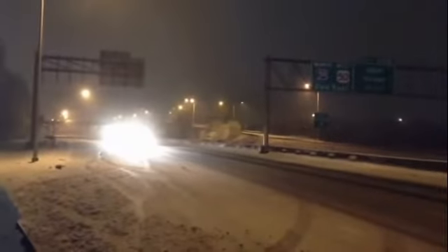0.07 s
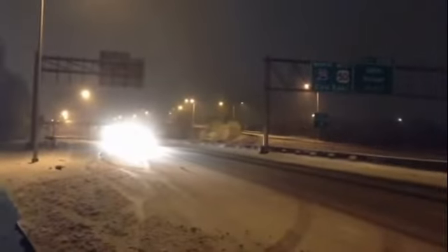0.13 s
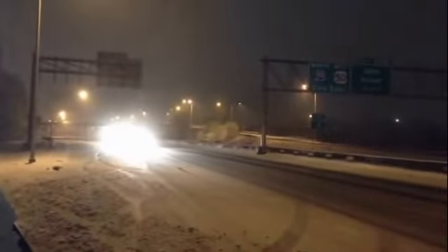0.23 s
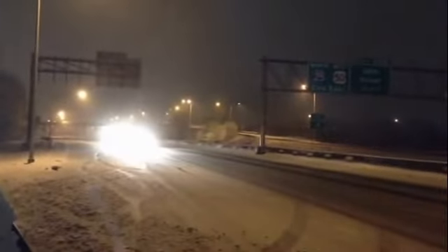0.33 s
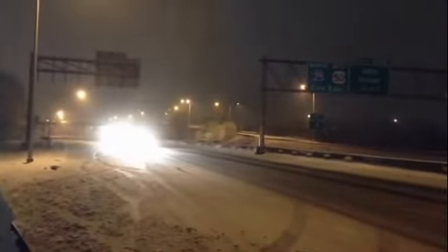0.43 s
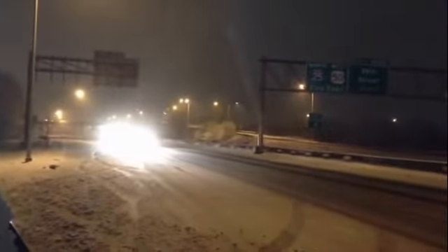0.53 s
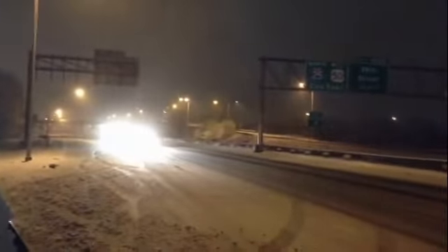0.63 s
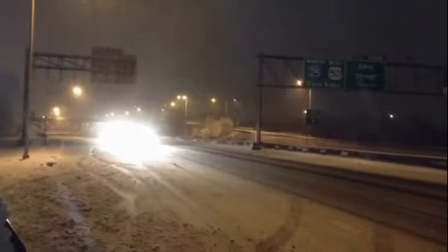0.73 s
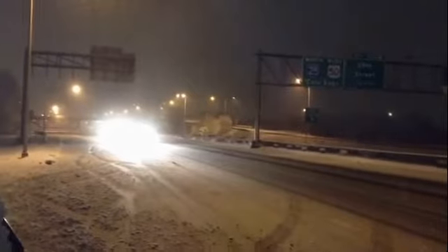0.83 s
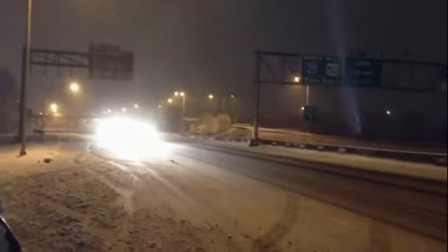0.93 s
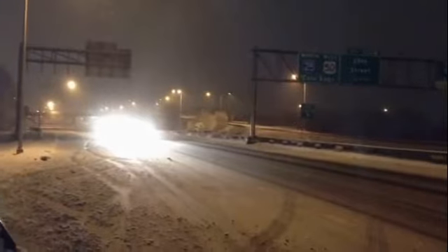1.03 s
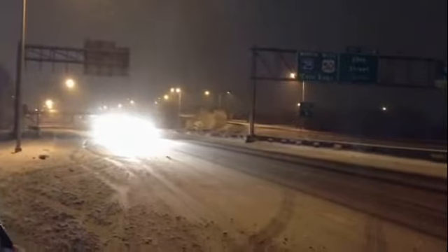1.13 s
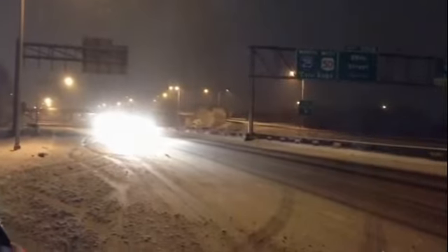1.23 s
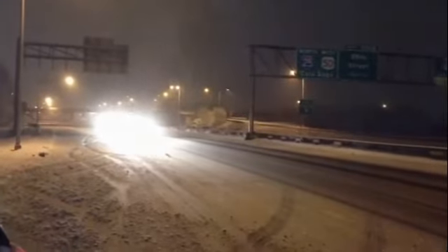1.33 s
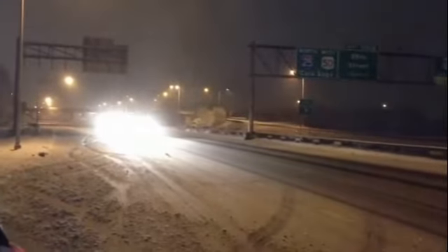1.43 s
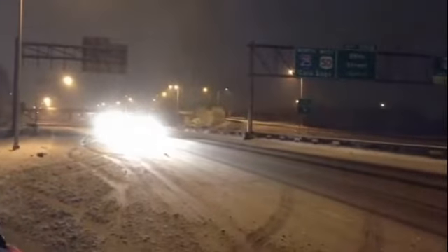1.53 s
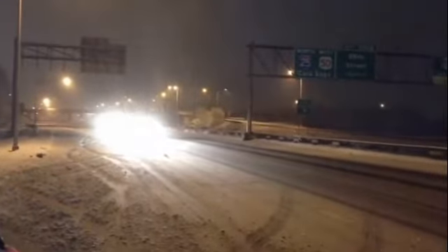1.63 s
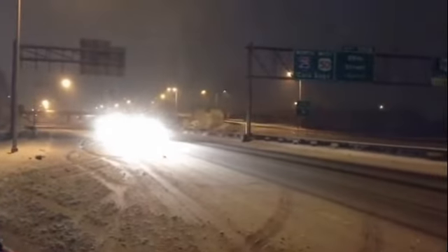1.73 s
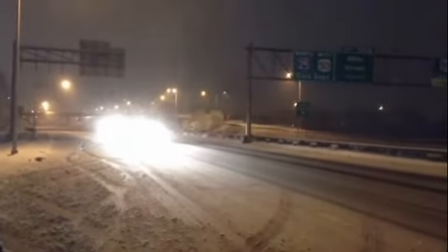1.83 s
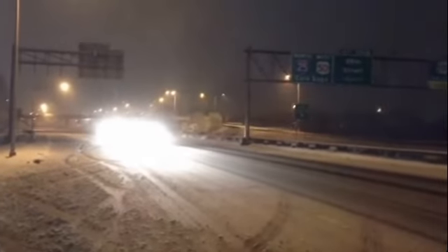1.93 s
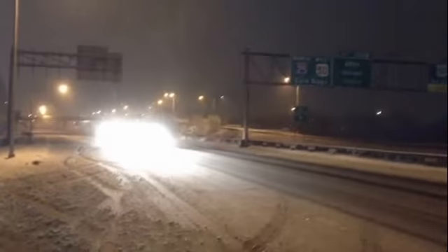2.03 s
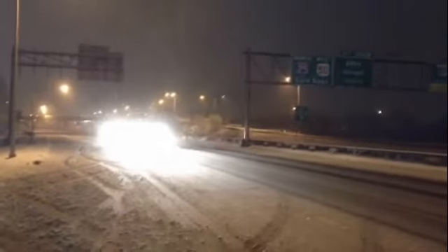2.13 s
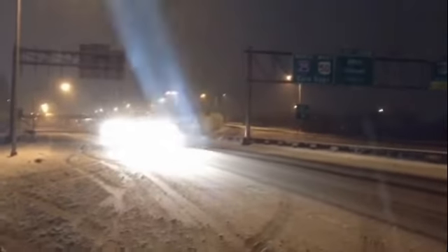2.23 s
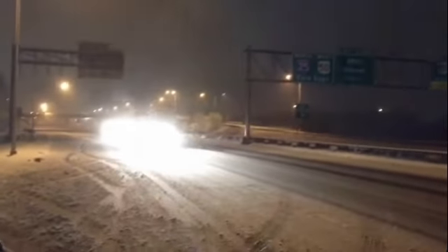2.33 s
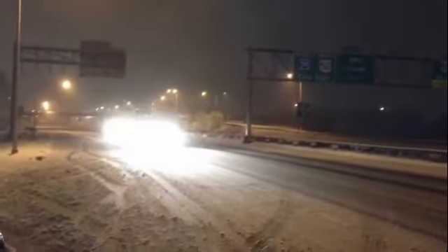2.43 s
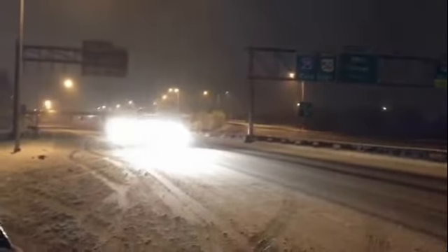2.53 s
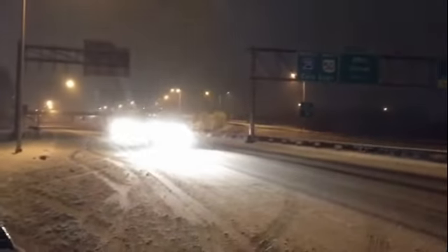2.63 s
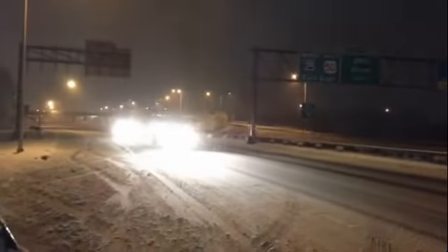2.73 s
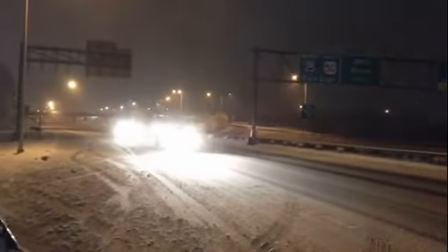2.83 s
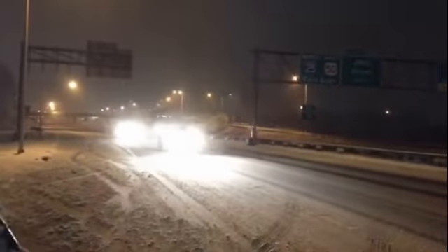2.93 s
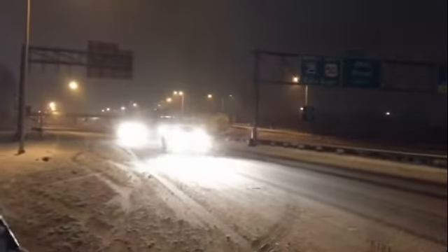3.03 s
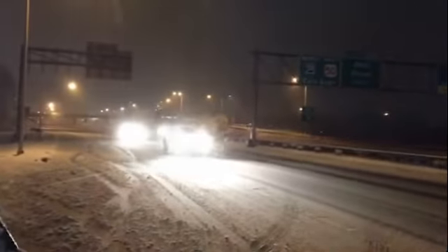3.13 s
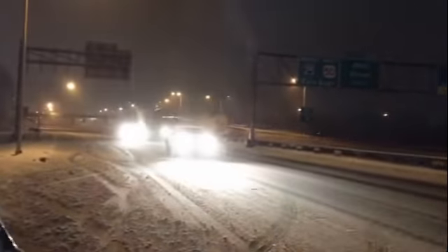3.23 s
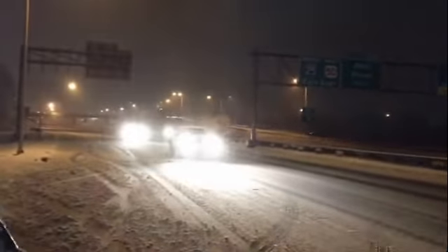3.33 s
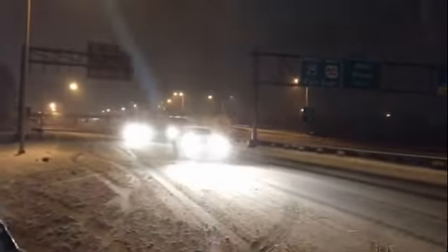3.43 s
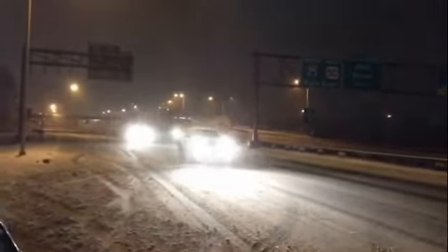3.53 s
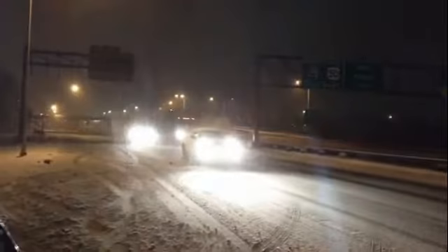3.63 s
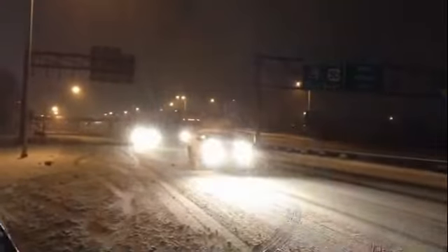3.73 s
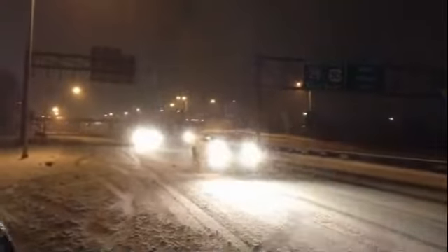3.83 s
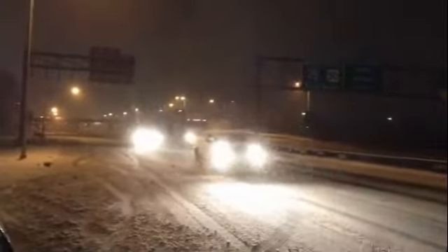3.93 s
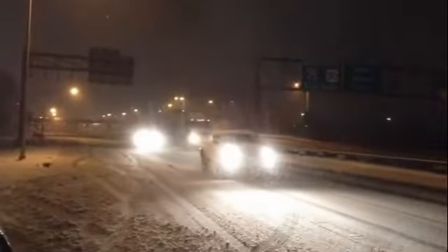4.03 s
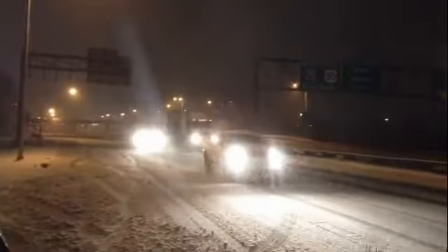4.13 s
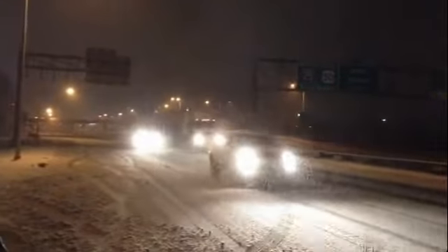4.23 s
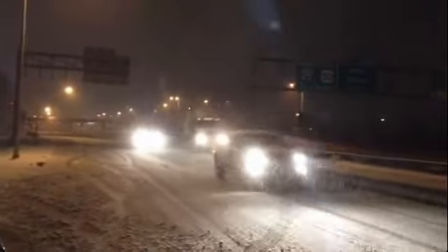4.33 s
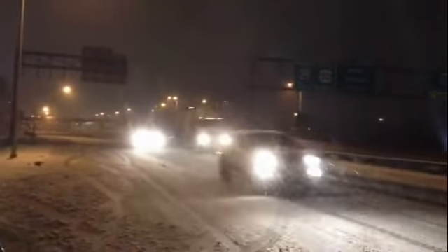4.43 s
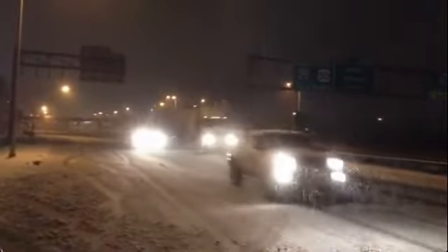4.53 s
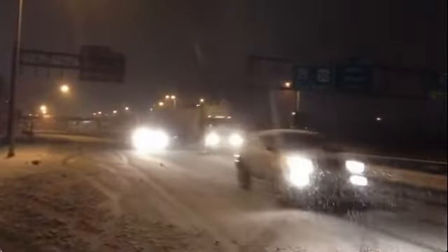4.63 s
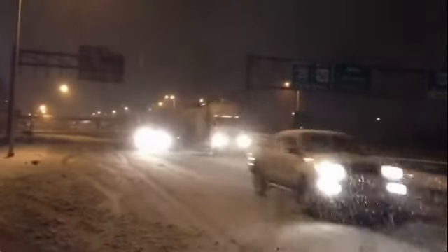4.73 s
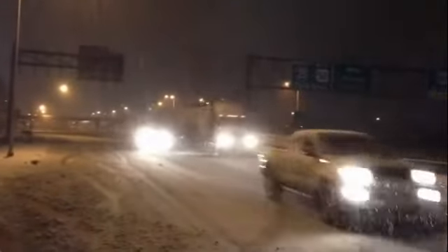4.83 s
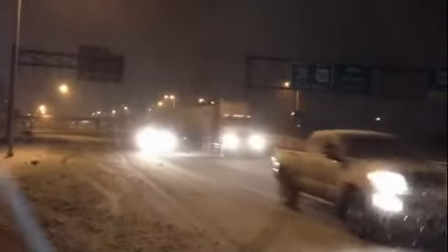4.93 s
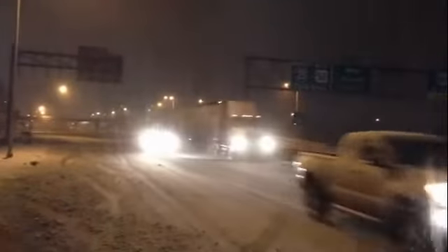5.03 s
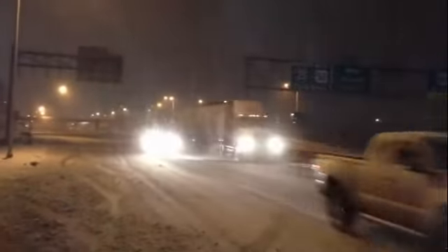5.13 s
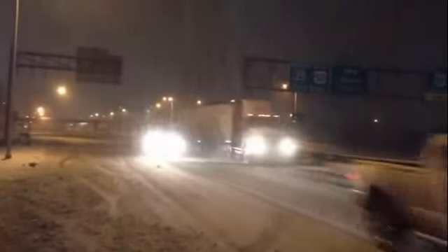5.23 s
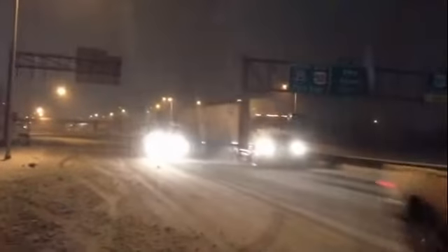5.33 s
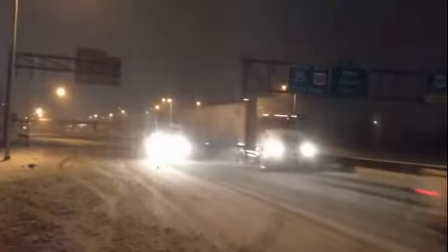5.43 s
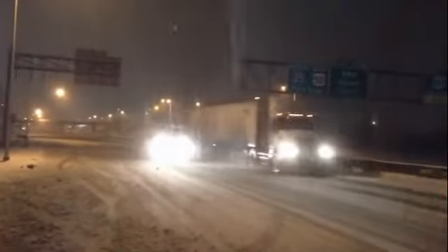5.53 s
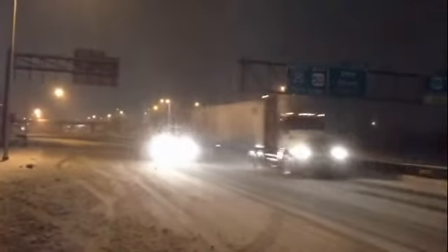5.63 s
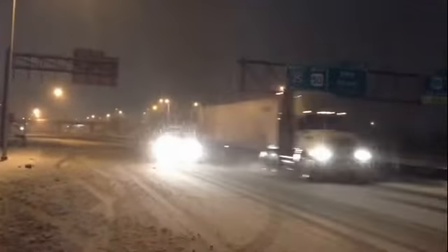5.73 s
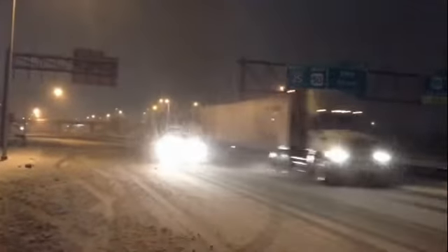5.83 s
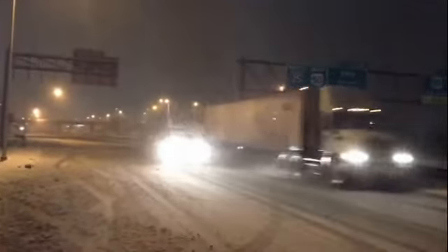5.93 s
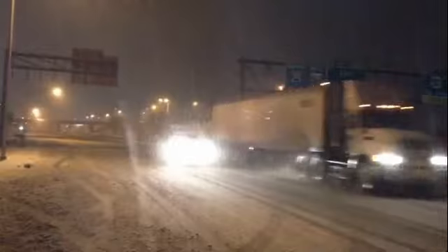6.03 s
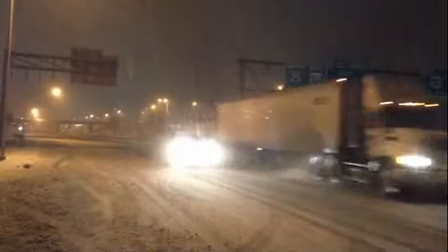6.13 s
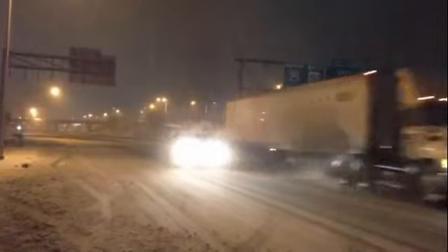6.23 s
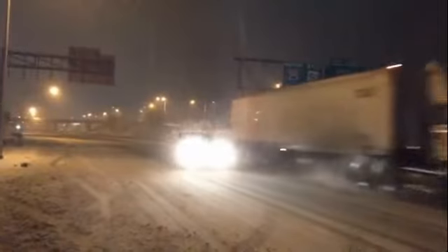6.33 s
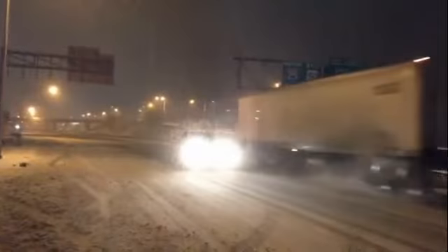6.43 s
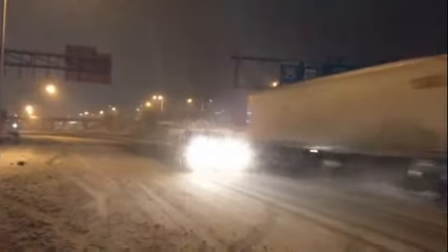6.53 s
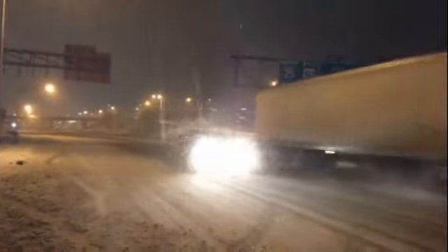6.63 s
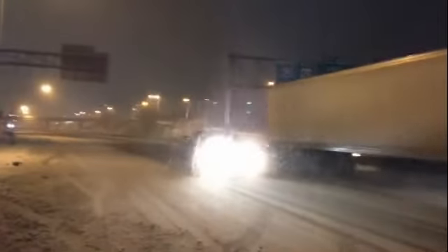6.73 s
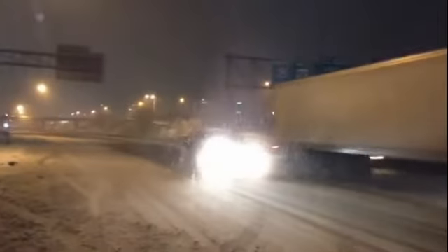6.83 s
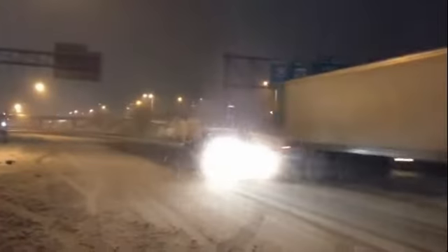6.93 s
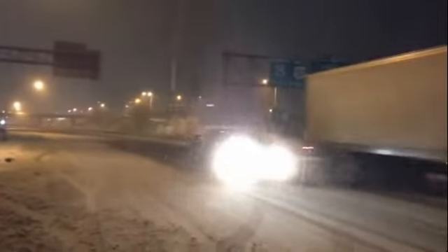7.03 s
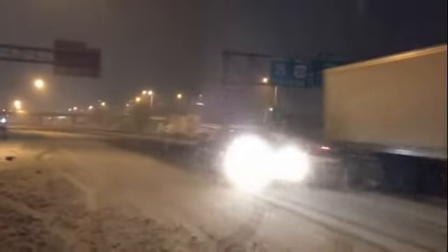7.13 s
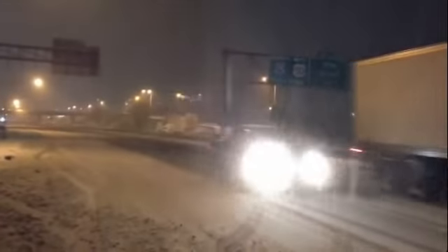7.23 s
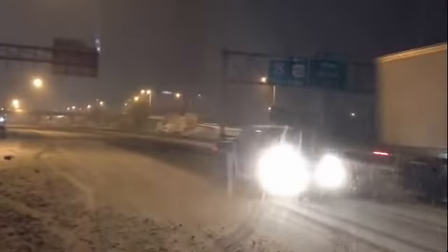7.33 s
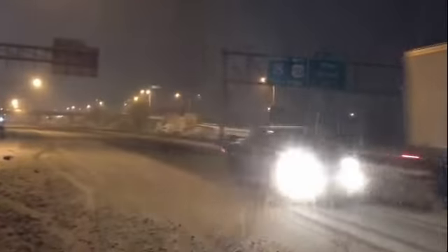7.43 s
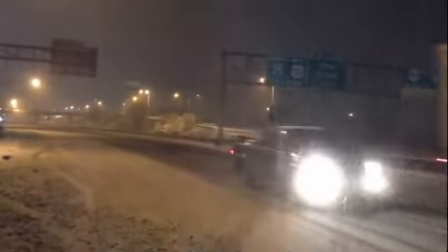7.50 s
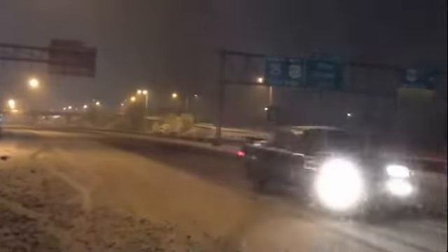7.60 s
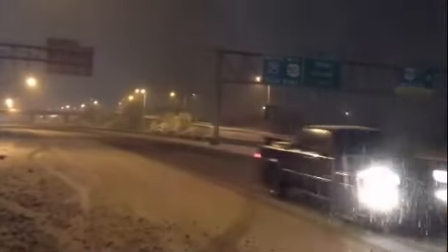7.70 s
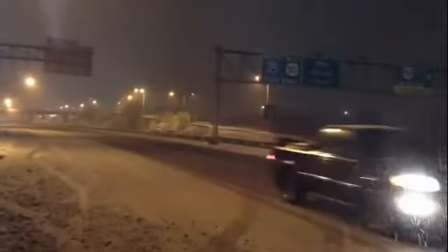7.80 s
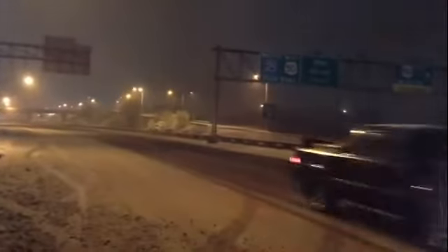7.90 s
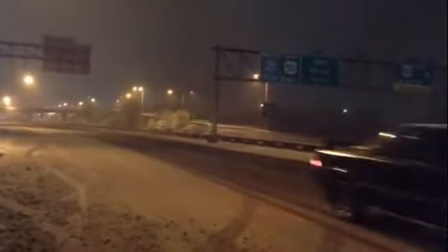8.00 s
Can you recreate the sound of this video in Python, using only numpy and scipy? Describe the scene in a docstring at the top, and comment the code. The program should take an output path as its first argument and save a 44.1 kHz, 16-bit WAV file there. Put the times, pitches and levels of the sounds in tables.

```python
"""Night on a snow-covered highway, heard at one microphone.
At first icy flakes tick on its case (struck modes) over a steady far wash and a fading rasp (filtered noise).
A pickup, an articulated lorry and a second pickup then near and pass, by spreading and absorption.
Body rumble, tyre roar, tread hiss and flung slush are noises whose spectra shift with nearness.
Last, an exhaust drone, a sine of wavering frequency, swells as the second pickup passes and just after."""
import sys
import numpy as np
from scipy import signal
from scipy.fft import rfft, irfft
from scipy.io import wavfile

SR = 44100
rng = np.random.default_rng(int(sys.argv[2]) if len(sys.argv) > 2 else 0)


def master_out(mix):
    """Clip the mix to full scale and print it as 16-bit PCM to the path in sys.argv[1]."""
    frames = np.transpose(np.atleast_2d(mix))
    ceiling = np.clip(frames, -1, 1)
    pcm = np.round(ceiling * 32767).astype(np.int16)
    wavfile.write(sys.argv[1], SR, pcm)


N = 355622


def from_db(db):
    """Level to amplitude: 20 dB is a factor of ten."""
    return 10 ** (np.asarray(db) / 20)


def rms_one(x):
    """Normalisation: scale to an rms amplitude of 1."""
    return x / np.sqrt(np.mean(x ** 2) + 1e-20)


def in_time(rows):
    """Linear interpolation: each column of a curve at every sample."""
    s, *columns = np.transpose(rows)
    return [np.interp(np.arange(N) / SR, s, c) for c in columns]


def drift(corner_hz):
    """Low-passed noise: a random fluctuation of rms 1 from two equal poles at corner_hz."""
    step = 40  # samples between computed values
    pole = np.exp(-2 * np.pi * corner_hz * step / SR)
    noise = rng.standard_normal(N // step + 2002)
    slow = signal.lfilter([1], [1, -2 * pole, pole * pole], noise)[2000:]  # settled part
    return np.interp(np.arange(N) / step, np.arange(len(slow)), rms_one(slow))


def coloured(x, spectrum):
    """Spectral shaping: a gain curve, falling a further 60 dB per octave beyond its ends; rms 1."""
    hz, level_db = np.transpose(spectrum)
    octave = np.log2(np.maximum(np.arange(N // 2 + 1) * SR / N, 1))
    points = np.log2(hz)
    outside = np.abs(octave - np.clip(octave, points[0], points[-1]))
    gain = from_db(np.interp(octave, points, level_db) - 60 * outside)
    return rms_one(irfft(rfft(x) * gain, N))


def approaching(x, colours, nearness):
    """Spectral interpolation: x crossfades from one colour to the next with each step of nearness."""
    place = np.clip(nearness, 0, len(colours) - 1)
    return sum(np.maximum(1 - np.abs(place - k), 0) * coloured(x, c) for k, c in enumerate(colours))


def crunch(per_s, spread_db, share):
    """Shot noise: random single grains hold a share of the power, a smooth rush the rest."""
    sizes = from_db(spread_db * np.minimum(rng.exponential(1, N), 4)) * rng.choice([-1, 1], N)
    grains = rms_one(sizes * (rng.random(N) < per_s / SR))
    share = np.clip(share, 0, 1)
    return np.sqrt(share) * grains + np.sqrt(1 - share) * rng.standard_normal(N)


def ring(clicks, hz, t60):
    """Damped resonance: a unit click starts a decaying sine of initial amplitude 1."""
    r, w = from_db(-60 / (t60 * SR)), 2 * np.pi * hz / SR
    return signal.lfilter([0, np.sin(w)], [1, -2 * r * np.cos(w), r * r], clicks + 1e-18)


# stretches of wetter (+) or drier (-) snow: (start [s], end [s], change of tread hiss [dB])
PATCHES = [(2.48, 2.693, 2.1), (3.073, 3.34, 3), (3.396, 3.48, -1), (3.524, 4.22, 3.5),
           (4.406, 5.034, -1.7), (6.595, 6.715, -2)]
PATCH_EDGE_S = 0.064  # time to roll into a patch


def wetness():
    """Surface dependence: the level ramps as the wheels roll into each patch and out again."""
    t = np.arange(N) / SR
    change = 0
    for start, end, change_db in PATCHES:
        inside = np.clip(np.minimum(t - start, end - t) / PATCH_EDGE_S + .5, 0, 1)
        change = change + change_db * inside
    return change


# brief surges and dips: (time [s], change of tread hiss [dB], change of spray [dB])
SURGES = [(2.03, 1, 2), (3.25, 2, -0.5), (3.64, 1.3, -0.5), (4.11, 0.5, 0), (5.75, 1.3, 1), (6.0, 1, .5),
          (6.25, 0.5, .5), (6.39, -.5, 3.5), (6.55, 2, 2.5), (7.0, -1, 2), (7.09, 1, 1.5), (7.69, 1, 2)]
SURGE_S = 0.034  # from the peak to 1/e of the change


def surge(changes_db):
    """Amplitude modulation: the level briefly swells or dips along a Gaussian curve."""
    t = np.arange(N) / SR
    return sum(change_db * np.exp(-((t - row[0]) / SURGE_S) ** 2) for row, change_db in zip(SURGES, changes_db))


# first pickup, lorry's tractor, its trailer, second pickup, with levels when abreast:
# (abreast [s], lane distance [m], rumble [dB], tyre roar [dB], tread hiss [dB], spray [dB])
PASSES = [(5.63, 6.3, -28.1, -25, -19.5, -29), (6.08, 5.87, -34.5, -21, -13.5, -42),
          (6.89, 8.07, -30, -25.5, -13.5, -25), (7.75, 6.3, -24, -21, -17, -23.5)]
SPEED_M_PER_S = 13.94
# snow soaks up sound on its way, the finest hiss most
SNOW_LOSS_DB_PER_M, MIST_LOSS_DB_PER_M = 0.2466, .35
# steady wash of traffic far up the road, in each of the sounds
FAR_RUMBLE_DB, FAR_ROAR_DB, FAR_HISS_DB, FAR_SPRAY_DB, FAR_MIST_DB = -41, -42, -39, -59, -67


def traffic(sound, loss_db_per_m, far_db):
    """Spherical spreading and absorption: gain of one sound; the vehicles' powers add to the far wash."""
    t = np.arange(N) / SR
    power = from_db(far_db) ** 2
    for abreast_s, lane_m, *levels_db in PASSES:
        level_db = dict(zip(("rumble", "roar", "hiss", "spray"), levels_db))[sound]
        distance_m = np.hypot(lane_m, SPEED_M_PER_S * (t - abreast_s))
        absorbed_db = loss_db_per_m * (distance_m - lane_m)
        power = power + (from_db(level_db - absorbed_db) * lane_m / distance_m) ** 2
    return np.sqrt(power)


# flakes on the case: (time [s], strength [dB], crumbling after it [dB])
TICKS = [(0.0738, -25, -42), (.0835, -38, -46), (.2285, -40, -47), (.3098, -28, -56), (0.4044, -9, -48),
         (0.4183, -25, -52), (.4515, -38, -51), (.5423, -32, -58), (.805, -39, -56)]
# modes of the case: (frequency [Hz], level [dB], t60 [s])
CASE = [(2380, -4, 0.0036), (3050, -8, 0.0068), (3630, -10.5, 0.006), (7120, -5, .005), (7650, -6, 0.0044),
        (8540, -13, 0.0066), (11900, -29, .005), (13800, -30, .003)]
# colour of the crumbling: (frequency [Hz], level per Hz [dB])
CRUMBLE = [(2500, 0), (4500, -2), (8000, 3), (10500, -4), (15000, -9)]
CRUMBLE_T60_S = 0.052


def flakes():
    """Modal impact: a flake strikes the modes of the case, then crumbles as decaying noise."""
    clicks, crumbling = np.zeros(N), np.zeros(N)
    for s, level_db, crumble_db in TICKS:
        clicks[round(s * SR)] = from_db(level_db)
        crumbling[round(s * SR)] = from_db(crumble_db)
    rings = 0
    for k, (hz, mode_db, t60) in enumerate(CASE):
        # a 900 Hz wide resonance lets the push build up over a few cycles of each mode
        swell = signal.iirpeak(min(hz, .45 * SR), hz / 900, fs=SR)
        mode = signal.lfilter(*swell, ring(clicks, hz, t60))
        rings = rings + (-1) ** k * from_db(mode_db) * mode
    decay = from_db(-60 / (CRUMBLE_T60_S * SR))
    fading = signal.lfilter([1], [1, -decay], crumbling + 1e-18)
    return rings + fading * coloured(rng.standard_normal(N), CRUMBLE)


# the last pickup's exhaust: (time [s], drone level [dB])
EXHAUST = [(6.4, -60), (7, -43), (7.5, -38), (7.85, -37), (8.05, -25.5)]
EXHAUST_HZ, EXHAUST_WIDTH_HZ = 218, 7  # mean, and twice the rms wander


def exhaust():
    """Random frequency modulation: a wavering drone swells as the last pickup passes and just after."""
    drone_db, = in_time(EXHAUST)
    phase = 2 * np.pi * np.cumsum(EXHAUST_HZ + EXHAUST_WIDTH_HZ / 2 * drift(12.0)) / SR
    return from_db(drone_db + 1.7 * drift(11.0)) * np.sqrt(2) * np.sin(phase)


# spectra of spray, mist and heavy drops: (frequency [Hz], level per Hz [dB])
SPRAY_FAR = [(3000, -42), (5100, -12), (5410, -8), (6400, -4.5), (7320, -3), (8040, -0.5), (9500, -13.5),
             (12400, -44), (20900, -120)]
SPRAY_COMING = [(3000, -49), (5100, -23), (5400, -19), (5900, -1.5), (6560, 1), (7040, -0.5), (8040, -2),
                (8970, -12.5), (9500, -14), (12400, -43), (20900, -120)]
SPRAY_NEAR = [(3000, -40), (5100, -14.5), (6170, -2.5), (6900, 1), (8130, -5), (8810, -16), (9500, -18.5),
              (12400, -42), (20900, -120)]
MIST_FAR = [(5120, -30), (8700, 0), (9490, -7), (12500, -5), (14200, -11), (15200, -14)]
MIST_COMING = [(5120, -30), (8700, 2), (9050, -8), (11200, -0.5), (12800, -4), (13600, -10), (14200, -16),
               (15200, -17)]
MIST_NEAR = [(5120, -32), (8700, -9), (9030, -5.5), (10400, 0.5), (11700, -0.5), (12200, -1), (13200, -12),
             (14500, -6), (15200, -7)]
SPLASH = [(3500, -16), (3950, -3), (4400, 2), (4750, -6), (5000, -22)]
MIST_DB, SPLASH_DB = -7.5, -6.5  # relative to the spray


def slush(nearness, wet_db, lumps):
    """Droplet shot noise: flung slush sizzles; its mist and heavy drops carry only a short way."""
    spray_gain = traffic("spray", SNOW_LOSS_DB_PER_M, FAR_SPRAY_DB)
    mist_flutter = from_db(MIST_DB + .3 * drift(10))
    mist_gain = mist_flutter * traffic("spray", MIST_LOSS_DB_PER_M, FAR_MIST_DB - MIST_DB)
    drops = crunch(per_s=4000, spread_db=3.5, share=0.34)
    spray = spray_gain * approaching(drops, [SPRAY_FAR, SPRAY_COMING, SPRAY_NEAR], nearness)
    fine_drops = crunch(per_s=4500, spread_db=3.0, share=0.29)
    mist = mist_gain * approaching(fine_drops, [MIST_FAR, MIST_COMING, MIST_NEAR], nearness)
    close_by = np.clip(3 * (nearness - 1.9), 0, 1)
    splash = from_db(SPLASH_DB) * spray_gain * close_by * coloured(fine_drops, SPLASH)
    return (spray + mist + splash) * from_db(wet_db + .5 * lumps)


# spectra of body rumble and tyre roar: (frequency [Hz], level per Hz [dB])
RUMBLE_FAR = [(21, -83), (35, -51), (91, -27.5), (107, -16), (182, -2), (296, -9.5), (335, -8.5),
              (424, -18.5), (520, -14), (680, -43), (1140, -120)]
RUMBLE_NEAR = [(21, -73), (35, -43), (64, -40), (103, -15), (206, 1), (270, -2), (316, -2.5), (439, -11.5),
               (520, -13), (680, -23), (1140, -120)]
RUMBLE_CLOSE = [(21, -67), (35, -36), (60, -43), (115, -8), (211, -2), (258, -5), (296, -0.5), (350, -8),
                (392, -3), (424, -12), (520, -11), (680, -33), (1140, -120)]
ROAR_FAR = [(250, -42), (420, -13), (542, -7.5), (579, -1.5), (697, 1.5), (788, 2.5), (1050, -3),
            (1300, -1.5), (1690, -28), (2860, -120)]
ROAR_NEAR = [(250, -31), (420, -13), (445, -13.5), (703, 1), (961, 0), (1090, -3.5), (1300, -3),
             (1690, -13), (2860, -120)]
ROAR_CLOSE = [(250, -38), (420, -9), (466, -4), (616, -3.5), (886, 1), (1190, -4.5), (1300, -4.5),
              (1690, -38), (2860, -120)]


def rolling(nearness):
    """Broadband rolling noise: engines and bodies blur into a rumble; tyre carcasses roar above it."""
    rumble_colours = [RUMBLE_FAR, RUMBLE_FAR, RUMBLE_NEAR, RUMBLE_CLOSE]
    roar_colours = [ROAR_FAR, ROAR_FAR, ROAR_NEAR, ROAR_CLOSE]
    rumble = approaching(rng.standard_normal(N), rumble_colours, nearness)
    roar = approaching(rng.standard_normal(N), roar_colours, nearness)
    rumble_gain = traffic("rumble", SNOW_LOSS_DB_PER_M, FAR_RUMBLE_DB)
    roar_gain = traffic("roar", SNOW_LOSS_DB_PER_M, FAR_ROAR_DB) * from_db(0.51 * drift(11))
    return rumble_gain * rumble + roar_gain * roar


# spectra of tread hiss and of the early rasp: (frequency [Hz], level per Hz [dB])
HISS_FAR = [(650, -29), (1100, -0.5), (1230, -6), (1430, -0.5), (1620, -6.5), (1810, -5), (2440, -10.5),
            (2860, -11), (3810, -19.5), (4400, -18), (5000, -36), (6500, -66), (11000, -120)]
HISS_COMING = [(650, -41), (1100, -13), (1420, 1), (1570, -0.5), (1780, -4), (2020, 0.5), (2310, -1),
               (3420, -6), (4190, -16.5), (4600, -18.5), (5000, -23), (6500, -59), (11000, -120)]
HISS_NEAR = [(650, -17), (1100, -14.5), (1250, -5), (1640, 1), (1980, -2), (2410, -0.5), (2620, -6.5),
             (3150, -9), (3830, -19), (4490, -17.5), (5000, -28), (6500, -60), (11000, -120)]
HISS_CLOSE = [(650, -28), (1100, -3), (1190, -12), (1700, -1), (2150, -3.5), (2430, -4.5), (2700, -7),
              (2990, -9), (3670, -13), (4350, -15), (4550, -14), (5000, -26), (6500, -56), (11000, -120)]
RASP_COLOUR = [(1750, -3), (2000, 0), (2300, -1), (2600, -13)]
# at first the far tyres rasp a little brighter, then fade
RASP_DB, RASP_FADE_DB_PER_S = -40, 8.5


def treads(nearness, wet_db, lumps):
    """Granular fracture: tread blocks crush snow; lumps in the track make the hiss swell and shudder."""
    snow = crunch(per_s=3000, spread_db=2.0, share=0.23)
    shudder_db = .65 * lumps + .5 * drift(35)
    hiss = approaching(snow, [HISS_FAR, HISS_COMING, HISS_NEAR, HISS_CLOSE], nearness)
    rasp_gain = from_db(RASP_DB - RASP_FADE_DB_PER_S * np.arange(N) / SR)
    rasp = rasp_gain * coloured(rng.standard_normal(N), RASP_COLOUR)
    hiss_gain = traffic("hiss", SNOW_LOSS_DB_PER_M, FAR_HISS_DB)
    return from_db(wet_db + shudder_db) * (hiss_gain * hiss + rasp)


# how near the loudest wheels are:
# (time [s], nearness [0 far, 1 approaching, 2 abreast, 3 right in front])
NEARNESS = [(0, .3), (.8, 0), (1.6, 0.5), (2.1, 0.97), (3.1, 1.1), (4.2, 1.0), (4.6, 1.1), (5.3, 1.45),
            (6.2, 2.0), (6.8, 2), (7.4, 2.5), (7.7, 2.5)]
SPRAY_FOLLOWS = 0.72  # share of a patch's dB that the spray takes


def scene():
    """Superposition: all sources add at one microphone, alike in both channels."""
    nearness, = in_time(NEARNESS)
    wet_db, lumps = wetness(), drift(22)
    _, hiss_changes_db, spray_changes_db = np.transpose(SURGES)
    hiss = treads(nearness, wet_db + surge(hiss_changes_db), lumps)
    spray = slush(nearness, SPRAY_FOLLOWS * wet_db + surge(spray_changes_db), lumps)
    mono = rolling(nearness) + hiss + spray + exhaust() + flakes()
    return np.tile(mono, (2, 1))


NOTCH_HZ, NOTCH_Q = 5016, 15
CUTOFF_HZ = 15290


def record(dry):
    """Notch, saturation, low-pass: a narrow band near 5 kHz is missing, peaks are rounded, the top is cut."""
    notched = signal.lfilter(*signal.iirnotch(NOTCH_HZ, NOTCH_Q, fs=SR), dry)
    rounded = notched / (1 + (notched / .96) ** 8) ** (1 / 8)  # stays below .96
    # order 16, ripple .1 dB, stopband 90 dB down
    low_pass = signal.ellip(16, .1, 90, CUTOFF_HZ, fs=SR, output="sos")
    return signal.sosfilt(low_pass, rounded)


dry = scene()
out = record(dry)
master_out(out)
```